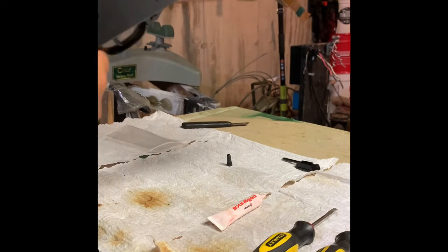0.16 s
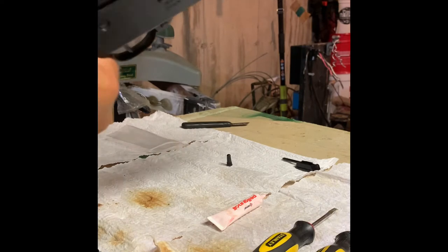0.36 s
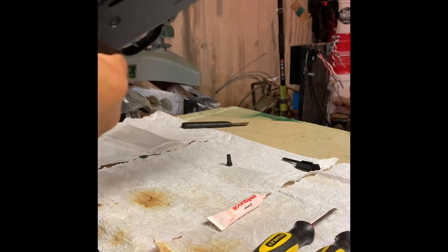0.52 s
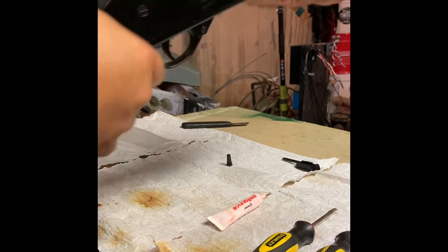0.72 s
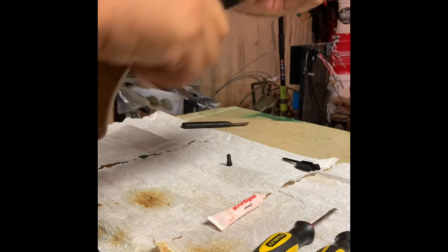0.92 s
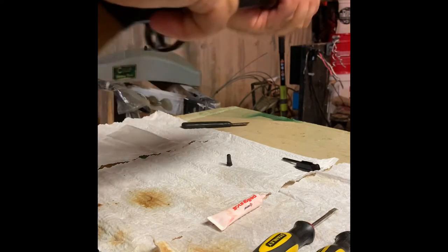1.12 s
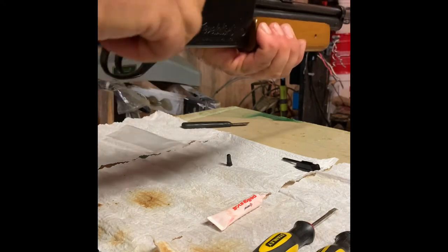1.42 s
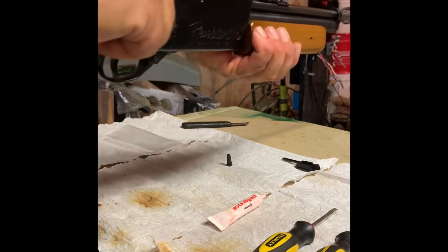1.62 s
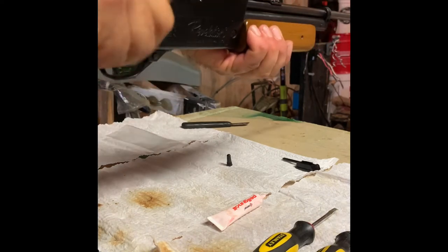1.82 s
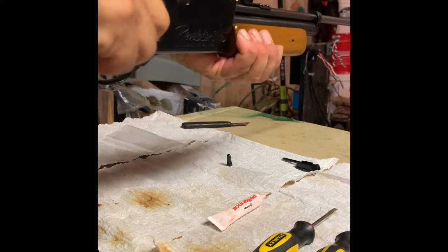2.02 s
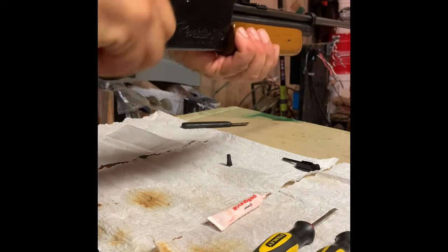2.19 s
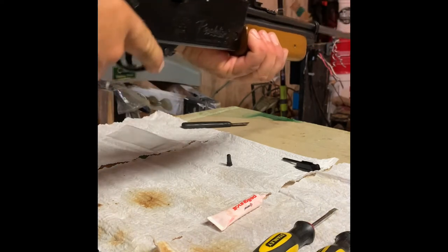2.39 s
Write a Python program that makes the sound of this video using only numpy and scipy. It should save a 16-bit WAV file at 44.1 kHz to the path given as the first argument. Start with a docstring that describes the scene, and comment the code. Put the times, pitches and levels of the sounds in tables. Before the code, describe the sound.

Close stereo sound of a rifle mechanism: a rapid ratcheting cluster ends in a hard clack with a low knock, then spaced bright metal clicks follow over quiet handling and low room hum in a small workshop.

```python
"""Air rifle action in a small workshop

The steel action of an air rifle is worked close by: noise bursts ring modes of small parts and housing as clicks,
gritty noise rings the same modes as bolt scrape, and sinking sines knock on the stock.
Coloured noise makes the hands rubbing over stock and metal and the low hum, which dips after loud hits; decaying
noise tails are the room's answer. The two channels carry nearly the same sound, turned in phase against each other."""
import sys
import numpy as np
from scipy import signal
from scipy.fft import rfft, irfft, next_fast_len
from scipy.io import wavfile
from scipy.ndimage import map_coordinates

SR = 44100
rng = np.random.default_rng(int(sys.argv[2]) if len(sys.argv) > 2 else 0)


def gain_from_db(level_db):
    """Turn a decibel level (scalar or array-like) into a linear amplitude factor."""
    decades = np.asarray(level_db, float) / 20
    return 10 ** decades


def wav_out(sig):
    """Save sig, one row per channel (or a flat mono array), as 16-bit PCM at SR to the path in sys.argv[1]."""
    wavfile.write(sys.argv[1], SR, np.round(np.clip(np.atleast_2d(sig).T, -1, 1) * 32767).astype(np.int16))


N = 112454


def unit(x):
    """Scale to rms 1."""
    return x / np.sqrt(np.mean(x ** 2) + 1e-20)


def along(points, hz):
    """Interpolate (frequency [Hz], value) points on a log frequency axis."""
    point_hz, value = np.transpose(points)
    return np.interp(np.log(hz + 1), np.log(point_hz + 1), value)


def curves(rows):
    """One value per sample for each column after the time."""
    time_s, *columns = np.transpose(rows)
    return [np.interp(np.arange(N) / SR, time_s, column) for column in columns]


def wobble(rate_hz):
    """Smooth random curve through rate_hz knots a second."""
    knots = rng.standard_normal(int(N * 2000 / SR) + 4)
    return map_coordinates(knots, [np.arange(N) * rate_hz / SR])


def filtered(x, response):
    """Multiply the spectrum of x by a complex response of frequency."""
    length = x.shape[-1]
    size = next_fast_len(length + 4096)
    spectrum = rfft(x, size) * response(np.fft.rfftfreq(size, 1 / SR))
    return irfft(spectrum, size)[..., :length]


def resonances(modes, extra_db):
    """Causal response of parallel second-order modes with alternating sign."""
    def response(f):
        total = 0
        for k, ((centre, width, db), extra) in enumerate(zip(modes, extra_db)):
            band = 1j * f * width
            total = total + (-1) ** k * gain_from_db(db + extra) * band / (centre ** 2 - f ** 2 + band)
        return total
    return response


def noise(rows, spectrum, flutter_db, rate_hz):
    """Coloured noise on a level curve, fluttering at random."""
    level_db, = curves(rows)
    colour = unit(filtered(rng.standard_normal(N), lambda hz: gain_from_db(along(spectrum, hz))))
    return gain_from_db(level_db + flutter_db * wobble(rate_hz)) * colour


# low room noise, dipping after loud hits: (time [s], level [dB])
HUM_LEVEL = [(0, -55.5), (.1, -59), (.19, -52), (.29, -47), (.33, -76), (.5, -71), (.62, -59), (.72, -56),
             (.85, -57), (1.02, -59.5), (1.1, -64), (1.25, -57.5), (1.38, -68.5), (1.43, -55),
             (1.51, -61.5), (1.56, -78), (1.68, -64.5), (1.75, -55.5), (1.83, -61.5), (1.95, -59),
             (2.03, -70), (2.2, -73.5), (2.55, -69.5)]
# its relative spectrum: (frequency [Hz], density [dB per Hz])
HUM_SPECTRUM = [(15, -42.5), (30, -14.5), (60, -6.5), (130, -9.5), (185, -2.5), (240, -10.5), (325, -3.5),
                (360, -7), (410, 1), (460, -5.5), (620, -8.5), (1100, -23.5), (2000, -29.5), (3200, -37),
                (6000, -54.5), (16000, -50.5)]


def hum():
    """Low room noise, strongest in the low hundreds of Hz; its level dips after loud hits."""
    return noise(HUM_LEVEL, HUM_SPECTRUM, flutter_db=1.5, rate_hz=30)


# hands on stock and metal: (time [s], level [dB])
RUB_LEVEL = [(0, -67.5), (.05, -70.5), (.08, -58), (.19, -52.5), (.3, -65.5), (.52, -63), (.57, -59),
             (.66, -56), (.79, -61.5), (.84, -74), (1.0, -94), (1.04, -77), (1.2, -77), (1.35, -64),
             (1.47, -53), (1.62, -62.5), (1.68, -53), (1.83, -66.5), (1.9, -58), (2.12, -59.5), (2.17, -68),
             (2.21, -76.5), (2.28, -71), (2.33, -80), (2.55, -90.5)]
# their relative spectrum: (frequency [Hz], density [dB per Hz])
SKIN_SPECTRUM = [(700, -0.5), (1400, 1.5), (2300, -3), (3200, 3.5), (4500, -4), (7000, -7), (10000, -8.5),
                 (15500, -5)]


def rub():
    """Skin friction over stock and metal: broadband noise that weakens in the treble."""
    return noise(RUB_LEVEL, SKIN_SPECTRUM, flutter_db=1.5, rate_hz=25)


# steel parts striking:
# (time [s], crack level [dB], crack focus [Hz], hollow ring over crack [dB], hollow focus [Hz])
STRIKES = [(0.0634, -57, 3500, 6, 2760), (0.1283, -53, 3500, 8.5, 2630), (0.1391, -50, 3500, 8.5, 2500),
           (0.2006, -28, 4040, -5, 2000), (.2114, -5.5, 7560, -15, 2465), (.215, -21.5, 6900, -2, 1113),
           (0.2273, -13.5, 6984, -17.5, 2050), (0.2336, -17.5, 7000, -14.5, 2027),
           (0.2399, -16.5, 7110, -16.5, 2002), (.2482, -21, 7500, -12, 2000), (.2575, -18, 6300, -14, 2500),
           (.26, -17, 6300, -14, 2500), (.2634, -3, 8400, -8, 2850), (.2888, -13, 8000, 1, 2300),
           (.2915, -14, 8000, 4, 2000), (.2932, -5, 11000, -6, 1900), (.2962, -14, 9000, -1, 1000),
           (.9168, -68, 3500, 9, 2100), (0.9993, -71.5, 3500, 15, 1984), (1.025, -60.5, 9050, -1.5, 1976),
           (1.095, -74.5, 3500, 16.5, 1780), (1.2663, -47, 4320, 7, 2030), (1.2682, -11.5, 4400, 1, 1900),
           (1.27, -8, 4400, -5.5, 1820), (1.2717, -18.5, 5000, 3, 1810), (1.2776, -3, 11800, -19.5, 1960),
           (1.2798, -11.5, 6840, -10, 1960), (1.2815, -18.5, 13500, -16, 1870),
           (1.3952, -24, 11000, -19, 1950), (1.429, -51.5, 3500, 15.5, 1907), (1.5026, -32, 7000, -6, 2000),
           (1.5072, -8, 10000, -15, 2000), (1.5082, -12, 15000, -12, 2000), (1.5102, -15, 9700, -3, 2000),
           (1.6897, -10, 12100, -14, 2300), (1.6907, -13, 6800, -12, 1500),
           (1.693, -12, 12300, -14.5, 1850), (1.8591, -34, 8400, -5, 2670),
           (1.8828, -39, 4550, -10.5, 2700), (1.987, -21, 4500, -4, 1900), (1.9893, -5, 9700, -10, 1900),
           (1.9918, -11, 6300, -11, 1600), (1.9929, -8, 9150, -18.5, 1680), (1.9982, -13, 4580, -9.5, 1550),
           (2.433, -66.5, 5010, 8.5, 1200)]
# hollow ring of the housing: (frequency [Hz], width [Hz], level [dB])
HOUSING_MODES = [(808, 390, -9.5), (1320, 290, 4), (1554, 570, -1), (1982, 210, 2), (2330, 360, -10.5),
                 (2710, 690, -2)]
# small steel parts: (frequency [Hz], width [Hz], level [dB])
STEEL_MODES = [(3500, 980, -6.5), (4400, 750, 3), (5530, 1800, 1.5), (6380, 1200, 3), (7420, 1300, -2),
               (8200, 810, 1), (9270, 1300, -1.5), (10480, 1200, -0.5), (12310, 320, 1.5),
               (13500, 1100, -1.5), (15100, 2700, 1.2)]
RISE_S, SNAP_T60_S = 0.00011, 0.011
RATTLE_T60_S, RATTLE_DB = 0.05, -17.5
FOCUS_OCT, CRACK_FOCUS_DB, HOLLOW_FOCUS_DB, MODE_SCATTER_DB = .3, 8, 11, 1.5


def struck(blow, modes, focus_hz, focus_db):
    """Modes rung by a blow, those near focus_hz favoured; peak 1."""
    octaves = np.log2(np.transpose(modes)[0] / focus_hz)
    favour_db = focus_db * np.exp(-.5 * (octaves / FOCUS_OCT) ** 2)
    scatter_db = MODE_SCATTER_DB * rng.standard_normal(len(modes))
    ring = filtered(blow, resonances(modes, favour_db + scatter_db))
    return ring / abs(ring).max()


def clicks():
    """Each strike, a sharp noise burst then a weaker rattle, rings small parts and housing."""
    out, t = np.zeros(N + SR), np.arange(4096) / SR
    decay = gain_from_db(-60 * t / SNAP_T60_S) + gain_from_db(RATTLE_DB - 60 * t / RATTLE_T60_S)
    shape = (1 - np.exp(-t / RISE_S)) * decay
    for time_s, db, crack_hz, hollow_db, hollow_hz in STRIKES:
        blow = rng.standard_normal((2, len(t))) * shape
        crack = struck(blow[0], STEEL_MODES, crack_hz, CRACK_FOCUS_DB)
        hollow = struck(blow[1], HOUSING_MODES, hollow_hz, HOLLOW_FOCUS_DB)
        out[round(time_s * SR):][:len(t)] += gain_from_db(db) * (crack + gain_from_db(hollow_db) * hollow)
    return out[:N]


# room decay: (frequency [Hz], T60 [s])
ROOM_T60 = [(200, 0.083), (1500, 0.31), (5000, 0.33), (15000, 0.21)]
ROOM_DB = -16.5


def tail():
    """Room answer of energy 1: noise whose frequencies each die at their own speed."""
    hz, t, bins = signal.stft(rng.standard_normal(SR // 2), SR, nperseg=256)
    decay = gain_from_db(-60 * t / along(ROOM_T60, hz)[:, None])
    answer = signal.istft(bins * decay, SR, nperseg=256)[1]
    return answer / np.linalg.norm(answer)


def workshop(x):
    """Four random room tails, alike in decay, take turns on successive stretches of sound."""
    stretch = (np.arange(N) // 8000) % 4
    return sum(signal.fftconvolve(x * (stretch == k), tail())[:N] for k in range(4))


# bolt scraping in its guide: (time [s], level [dB], hollow ring over hiss [dB])
SCRAPE_LEVEL = [(.195, -75, -4), (.212, -38, -6), (.225, -38, -6), (.252, -34, -8), (.262, -27, -10),
                (.272, -26, -6), (.29, -23, -3), (.299, -27, -2), (.304, -60, -2), (1.24, -90, -3),
                (1.262, -52, -3), (1.275, -30, -4), (1.29, -40, -3), (1.33, -60, -2), (1.40, -62, -1),
                (1.43, -52, 3), (1.45, -60, -1), (1.50, -48, -2), (1.53, -55, -2), (1.6, -80, -3),
                (1.87, -75, -4), (1.885, -51, -5), (1.92, -49, 2), (1.97, -48, 1), (1.982, -42, -2),
                (1.992, -34, -9), (2.01, -43, -10), (2.07, -100, -9)]
GRIT_DB, GRIT_RATE_HZ = 1.8, 500


def scrape():
    """Gritty friction rings the small parts and the housing, mostly its mode near 2 kHz."""
    level_db, hollow_db = curves(SCRAPE_LEVEL)
    grit = rng.standard_normal((2, N)) * gain_from_db(GRIT_DB * wobble(GRIT_RATE_HZ))
    hiss = unit(filtered(grit[0], resonances(STEEL_MODES, -1.1 * np.arange(len(STEEL_MODES)))))
    hollow = unit(filtered(grit[1], resonances(HOUSING_MODES, [-4.5, -1.5, 0.5, 7, -0.5, -3.5])))
    return gain_from_db(level_db) * (hiss + gain_from_db(hollow_db) * hollow)


# soft knocks on the stock: (time [s], level [dB], start above END_HZ [Hz])
KNOCKS = [(.2935, -22, 800), (0.2953, -26, 234.5), (1.275, -44, 130), (1.505, -55, 131),
          (1.991, -34.5, 595)]
SINK_S, END_HZ = 0.0094, 48.6
T60_AT_200_HZ_S = 0.044


def thud():
    """Each knock is a sine that sinks in pitch and dies, sooner the higher it starts."""
    out = np.zeros(N)
    for time_s, db, drop_hz in KNOCKS:
        t = np.maximum(np.arange(N) / SR - time_s, 0)
        cycles = drop_hz * SINK_S * (1 - np.exp(-t / SINK_S)) + END_HZ * t
        level_db = db - 60 * t * np.sqrt(drop_hz / 200) / T60_AT_200_HZ_S
        out += gain_from_db(level_db) * np.sin(2 * np.pi * cycles)
    return out


SMALL_HZ = 800


def small_parts(x):
    """Small parts radiate little low sound: two first-order high-passes at SMALL_HZ."""
    return filtered(x, lambda hz: (1j * hz / (SMALL_HZ + 1j * hz)) ** 2)


# depth of the phase flicker between channels: (frequency [Hz], depth [dB])
FLICKER_DEPTH = [(30, -25), (120, -19.5), (300, -10.5), (700, -3), (2500, -7.5), (5000, -21.5),
                 (15000, -23.5)]


def phase_flicker(mono):
    """Quadrature part under a random curve, added left and subtracted right."""
    other = filtered(mono * wobble(rate_hz=150), lambda hz: 1j * gain_from_db(along(FLICKER_DEPTH, hz)))
    return np.array([mono + other, mono - other])


def scene():
    """Rifle, room, hands and hum in two channels."""
    rifle = small_parts(clicks() + scrape()) + thud()
    mono = rifle + gain_from_db(ROOM_DB) * workshop(rifle) + rub() + hum()
    return phase_flicker(mono)


def low_pass(x):
    """Removes everything above the highest recorded frequency."""
    return signal.sosfilt(signal.butter(12, 16970, fs=SR, output="sos"), x)


# left leading right: (frequency [Hz], phase [rad])
PHASE_LEAD = [(0, 0), (700, -.6), (1300, -.6), (1700, .6), (3000, 1.3), (4000, 2.3), (4700, 3.14),
              (8900, 9.42), (13200, 15.7), (15500, 19), (17000, 18.7)]
# left over right: (frequency [Hz], level [dB])
LEFT_LEAN = [(30, -3.4), (80, -4.6), (160, -3.1), (300, -.7), (600, 1.4), (1200, -.1)]
# band limit: (frequency [Hz], level [dB])
BAND_LIMIT = [(15400, 0), (15900, -6), (16500, -24), (17000, -55), (20000, -75)]


def record(dry):
    """Turn the channels in phase, lean their levels apart and limit the band."""
    def response(hz):
        lead = np.interp(hz, *np.transpose(PHASE_LEAD))
        turn = np.exp(.5j * np.outer([1, -1], lead))
        lean = gain_from_db(np.outer([.5, -.5], along(LEFT_LEAN, hz)))
        return gain_from_db(along(BAND_LIMIT, hz)) * turn * lean
    mix = filtered(dry, response)
    return low_pass(mix)


dry = scene()
out = record(dry)
wav_out(out)
```